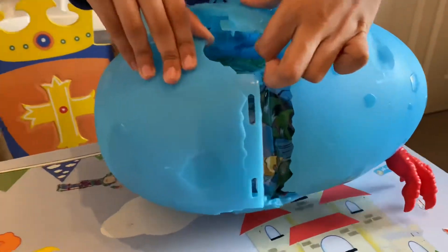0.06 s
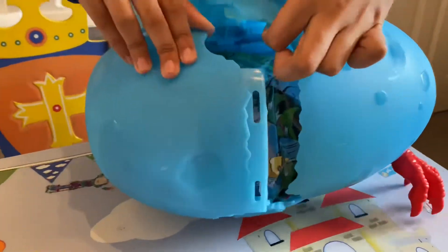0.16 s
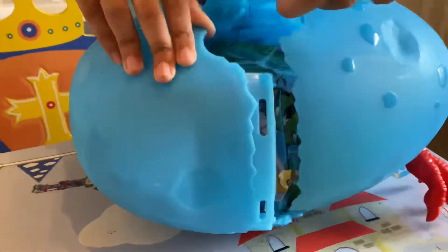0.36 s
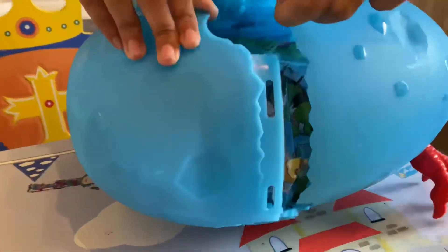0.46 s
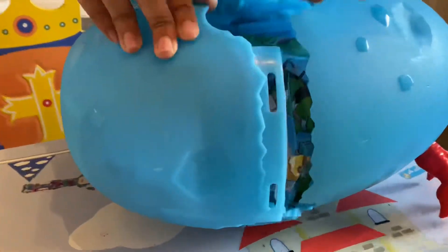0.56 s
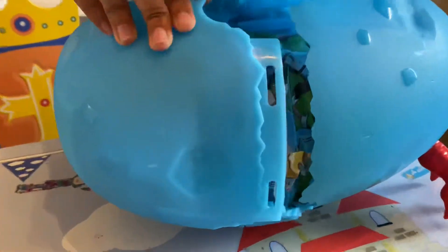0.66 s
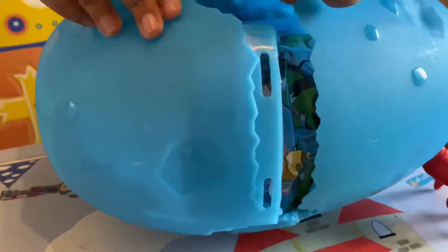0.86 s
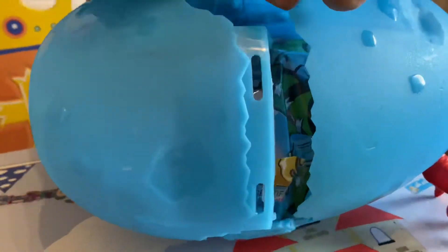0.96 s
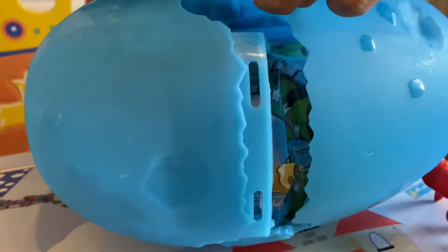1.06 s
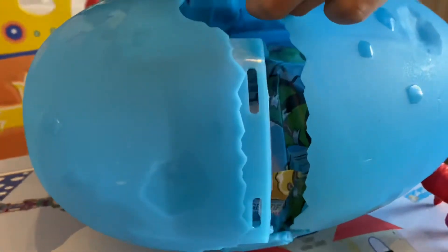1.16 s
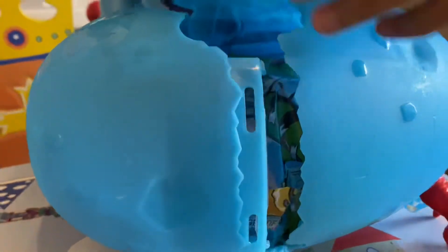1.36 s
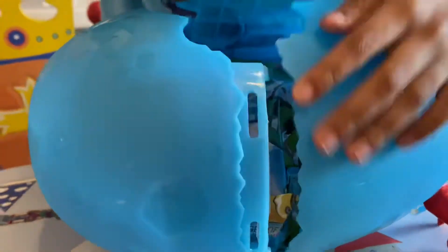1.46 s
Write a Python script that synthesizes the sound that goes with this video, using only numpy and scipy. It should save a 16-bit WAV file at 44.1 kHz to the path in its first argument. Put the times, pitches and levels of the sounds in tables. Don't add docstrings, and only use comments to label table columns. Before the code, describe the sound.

A big hollow plastic shell snaps sharply and thumps twice in quick succession, very close, in a small room; then faint rubs, creaks and soft knocks from fingers, ending with a small clicking drop.

```python
import sys
import numpy as np
from scipy import signal
from scipy.fft import rfft, irfft
from scipy.io import wavfile
from scipy.ndimage import uniform_filter1d

SR = 44100
rng = np.random.default_rng(int(sys.argv[2]) if len(sys.argv) > 2 else 0)


def volts_from_decibels(level):
    exponent = np.asarray(level, float) / 20
    return 10 ** exponent


def master_out(mix):
    frames = np.transpose(np.atleast_2d(mix))
    ceiling = np.clip(frames, -1, 1)
    pcm = np.round(ceiling * 32767).astype(np.int16)
    wavfile.write(sys.argv[1], SR, pcm)


N = 66150

# f/Hz, level/dB, decay time t60/s
SHELL_MODES = [(207, -2.5, 0.13), (245, 6, 0.11), (332, -3.5, 0.085), (420.4, -9, .25), (492.4, -15, 0.23),
               (610, -24, .2), (717, -7, 0.44), (881.5, -13.5, .2), (898, -9.5, 0.31), (1069, -16, .14),
               (1255, -9, 0.6), (1760, -20.5, 0.13), (2330, -22.5, 0.16), (2717, -13, .16)]
HALVES = np.array([[0.5], [-0.5]])


def evened(x):
    return x / np.sqrt(np.mean(x ** 2) + 1e-20)


def read(points, hz):
    f, value = np.transpose(points)
    return np.interp(np.log(hz + 1), np.log(f + 1), value)


def add(mix, s, sound):
    part = mix[..., round(s * SR):][..., :sound.shape[-1]]
    part += sound[..., :part.shape[-1]]


def colour(x, gain):
    hz = np.fft.rfftfreq(x.shape[-1], 1 / SR)
    return irfft(rfft(x) * gain(hz), x.shape[-1])


def delayed(x, s):
    return colour(x, lambda hz: np.exp(-2j * np.pi * hz * s))


def peak_gain(hz, middle_hz, share, db):
    return 1 + volts_from_decibels(db) / (1 + ((hz - middle_hz) / (share * middle_hz)) ** 2)


def pair(x):
    # f/Hz, likeness (0 to 1)
    likeness = [(60, 0.48), (300, 0.64), (700, 0.42), (1500, 0.34), (3000, 0.054), (16000, 0)]

    def same(hz):
        return np.clip(read(likeness, hz), 0, 0.999)

    middle = colour(x[0], lambda hz: np.sqrt((1 + same(hz)) / 2))
    side = colour(x[1], lambda hz: np.sqrt((1 - same(hz)) / 2))
    return np.array([middle + side, middle - side])


def resonate(x, peaks):
    out = 0
    for hz, width_hz, db in peaks:
        out = out + volts_from_decibels(db) * signal.lfilter(*signal.iirpeak(hz, hz / width_hz, SR), x)
    return out


def rings(x, modes):
    t = np.arange(SR // 2) / SR
    ring = 0
    for hz, db, t60 in modes:
        longest = 0.22 if hz > 150 else 1
        ring = ring + volts_from_decibels(db - 60 * t / min(t60, longest)) * np.sin(2 * np.pi * hz * t)
    ring = ring / np.linalg.norm(ring) / np.sqrt(SR / 400)
    return signal.fftconvolve(x, ring)[:N]


def room_air():
    # f/Hz, density/dB per Hz
    air_spectrum = [(15, -32), (25, 4.5), (256, -8), (384, -9), (887, -21), (1700, -18.5), (3820, -31),
                    (5880, -32.5), (16000, -48)]
    noise = colour(rng.standard_normal((2, N)), lambda hz: volts_from_decibels(read(air_spectrum, hz)))
    return volts_from_decibels(-71) * evened(pair(noise))


def room(x):
    # f/Hz, t60/s
    reverberation = [(100, 0.34), (400, 0.18), (1500, 0.25), (4000, 0.22), (10000, 0.21)]
    spacing = 20
    taps = np.zeros((2, SR // 2))
    at = np.arange(200, SR // 2 - 20, spacing)
    at_random = at + rng.integers(0, spacing, (2, len(at)))
    np.put_along_axis(taps, at_random, rng.choice([-1., 1.], (2, len(at))), 1)
    hz, t, z = signal.stft(taps, SR, nperseg=256)
    decay = volts_from_decibels(-60 * t / read(reverberation, hz)[:, None])
    tail = pair(signal.istft(z * decay, SR, nperseg=256)[1])
    return signal.fftconvolve(x, tail / np.linalg.norm(tail[0]), axes=1)[:, :N]


def patchy(x):
    z = signal.stft(x, nperseg=256)[2]
    patches = rng.standard_normal(z.shape[1:])
    patches = uniform_filter1d(patches, size=4, axis=0)
    patches = uniform_filter1d(patches, size=8, axis=1)
    return signal.istft(z * volts_from_decibels(3.5 * evened(patches)), nperseg=256)[1][:, :N]


def slide_noise(slide_db, sing_hz):
    # f/Hz, density/dB per Hz
    slide_spectrum = [(350, -31), (600, -16), (1530, -6.5), (2180, -5.5), (6200, -10.5), (10900, -18),
                      (12200, -24.5), (14300, -13.5), (16000, -43.5)]
    grains_per_s, grain_db = 4400, 2
    noise = rng.standard_normal((2, 8192))
    size = np.minimum(rng.exponential(1, 8192), 3)
    caught = rng.random(8192) < grains_per_s / SR
    grains = noise * (0.5 + volts_from_decibels(grain_db * size) * caught)
    brighten_db = 0.12 * (slide_db + 47)

    def gain(hz):
        body = volts_from_decibels(read(slide_spectrum, hz) + brighten_db * np.log2(1 + hz / 2000)) * (hz > 500)
        fixed_peaks = peak_gain(hz, 1300, 0.038, 0) * peak_gain(hz, 2207, 0.018, 0)
        return body * fixed_peaks * peak_gain(hz, sing_hz, 0.05, 7)

    return evened(colour(grains, gain))


def creak_noise():
    # f/Hz, width/Hz, level/dB
    creak_peaks = [(176, 180, 5.5), (345, 50, 8), (406, 20, -6), (477, 30, -21.5), (89.5, 19, -12)]
    slips_per_s, slip_db = 380, 4
    noise = rng.standard_normal((2, 8192))
    size = np.minimum(rng.exponential(1, 8192), 3)
    slipped = rng.random(8192) < slips_per_s / SR
    slips = noise * volts_from_decibels(slip_db * size) * slipped
    return evened(resonate(resonate(slips, creak_peaks), [(300, 1500, 0)]))


def rubbing():
    # middle t/s, length/s, slide level/dB, pressure level/dB, singing f/Hz
    strokes = [(.02, 0.13, -72.5, -56, 960), (0.099, 0.06, -103, -64.5, 770),
               (.203, .012, -47.5, -55.5, 2768), (0.393, 0.045, -72, -58.5, 2480),
               (.555, 0.07, -67.5, -65.5, 1190), (.7, 0.056, -76, -70.5, 1930),
               (.748, 0.051, -64.5, -61, 4920), (.84, 0.062, -55.5, -61, 8300),
               (0.889, 0.048, -47, -50, 2200), (.975, 0.074, -59.5, -52.5, 1990),
               (1.035, 0.047, -61.5, -64, 1236), (1.087, 0.13, -67, -57, 1300),
               (1.15, 0.088, -55.5, -53, 2056), (1.225, 0.066, -60, -61.5, 1330),
               (1.319, 0.18, -66, -60.5, 1780), (1.425, 0.043, -40, -45.5, 2390),
               (1.47, 0.069, -47.5, -66, 2290)]
    # t/s, left-right level/dB
    hand_place = [(.3, 0), (0.599, 2), (1., 1.5), (1.15, -2), (1.4, 0.5)]
    lead_s = 0.5
    t = np.arange(-4096, 4096) / SR
    out = np.zeros((2, N + SR))
    for middle, length, slide_db, press_db, sing_hz in strokes:
        swell = np.exp(-(2 * t / length) ** 2)
        contact = volts_from_decibels(slide_db) * slide_noise(slide_db, sing_hz) + volts_from_decibels(press_db) * creak_noise()
        add(out, middle + lead_s + t[0], swell * contact)
    rub = patchy(pair(out[:, SR // 2:][:, :N]))
    pan_db = np.interp(np.arange(N) / SR, *np.transpose(hand_place))
    return rub * volts_from_decibels(pan_db * HALVES)


def squeak():
    # t/s, f/Hz, level/dB
    squeak_path = [
        (1.268, 8800, -74),
        (1.287, 9380, -61),
        (1.345, 9300, -63),
        (1.382, 8400, -72),
    ]
    t = np.arange(N) / SR
    s, hz, db = np.transpose(squeak_path)
    waver = 1 + 0.0039 * evened(uniform_filter1d(rng.standard_normal(N), size=150))
    phase = 2 * np.pi * np.cumsum(np.interp(t, s, hz) * waver) / SR
    return volts_from_decibels(np.interp(t, s, db, -200, -200)) * np.sin(phase)


def cracks():
    # t/s, level/dB, t60/s, brightness/dB per octave, ringing edge f/Hz
    fractures = [(0.0202, -53.5, 0.055, 0, 2560), (0.0659, -63, 0.029, -35, 865),
                 (0.2054, -14.5, 0.034, 0.5, 2640), (0.2099, -15, 0.037, 5.5, 7040),
                 (0.2162, -19.5, 0.17, 0, 6600), (0.236, -12, 0.026, 1.5, 1940),
                 (0.241, -15.5, 0.057, -1.5, 970), (0.3797, -38, 0.017, 4, 2360),
                 (.5302, -67.5, 0.071, 8, 6920), (0.8031, -51, 0.021, 3, 3940),
                 (0.8888, -39.5, 0.039, 12, 3700), (0.8973, -55, 0.071, 9.5, 2250),
                 (0.9663, -51.5, 0.048, 5.5, 2060), (1.293, -53, .025, -8, 1190),
                 (1.4062, -34, 0.086, 11, 6200), (1.416, -33.5, 0.15, 14.5, 3600)]
    # f/Hz, density/dB per Hz
    fracture_spectrum = [(300, -10.5), (800, -8), (1300, -11.5), (2500, -18.5), (4500, -32.5),
                         (10000, -46.5), (16000, -53.5)]
    rise_s, pan_db = 0.0011, -1.5
    out, t = np.zeros((2, N)), np.arange(8192) / SR
    for s, db, t60, tilt_db, edge_hz in fractures:
        size = np.minimum(rng.exponential(1, 8192), 3)
        grit = rng.standard_normal((2, 8192)) * volts_from_decibels(2.5 * size)

        def gain(hz):
            tilted_db = read(fracture_spectrum, hz) + tilt_db * np.log2((hz + 50) / 2000)
            return volts_from_decibels(tilted_db) * (hz > 250) * peak_gain(hz, edge_hz, 0.081, 8.5)

        envelope = np.minimum(t / rise_s, 1) * volts_from_decibels(db - 60 * t / t60 + pan_db * HALVES)
        add(out, s, envelope * pair(evened(colour(grit, gain))))
    return out + volts_from_decibels(7) * rings(out.mean(0), SHELL_MODES)


def knocks():
    # t/s, level/dB, end pitch f/Hz, length/s, table share/dB
    hard_knocks = [
        (0.0197, -52, 276, 0.013, 10),
        (0.065, -40, 245, 0.01, -3.5),
        (0.2082, -8, 239, .011, -6),
        (0.2372, -8.5, 246.2, .011, -5.5),
        (0.377, -38.5, 406, 0.0061, -3.5),
        (.854, -38, 243, .013, -0.5),
        (1.292, -46, 263, 0.019, -6.5),
        (1.417, -36.5, 171.7, .016, 8.5),
    ]
    # t/s, level/dB, pitch f/Hz, length/s, table share/dB
    soft_bumps = [(.093, -52, 300, 0.011, -4), (0.22, -11.5, 323.5, .016, -7.5),
                  (0.245, -16.5, 300, .012, -3.5), (.52, -58.5, 361, .015, -11.5),
                  (0.557, -58.5, 368, .012, -7.5), (0.814, -54.5, 371, 0.019, -13),
                  (.872, -46.5, 205, 0.0075, 0), (.945, -53.5, 438, 0.018, -13),
                  (0.973, -46.5, 389, 0.013, -10), (0.985, -45.5, 300, 0.0138, -1),
                  (1.131, -48, 331, 0.019, -8), (1.207, -51, 413, 0.023, -13),
                  (1.344, -53.5, 337, 0.013, -7), (1.402, -31.5, 345, 0.018, -3)]
    # f/Hz, level/dB, t60/s
    table_modes = [(96.9, 1, .36), (139, 1.5, 0.14), (63, -15, 0.24), (199, 3.5, 0.11), (250, 1.5, 0.11),
                   (168, 1.5, 0.053)]
    start_ratio, drop_s, sag_ratio = 2.678, 0.0023, 1.52
    push_s = 0.0045
    jolt = np.sin(np.pi * np.arange(0, push_s, 1 / SR) / push_s) ** 2
    sweep, push = np.zeros(N), np.zeros(N)
    for hardness, hits in ((0.99, hard_knocks), (0.012, soft_bumps)):
        for s, db, hz, length, table_db in hits:
            t = np.arange(0, length, 1 / SR)
            fall = sag_ratio ** (1 - t / length) * (1 + (start_ratio - 1) * np.exp(-t / drop_s))
            phase = 2 * np.pi * np.cumsum(hz * fall ** hardness) / SR
            add(sweep, s, volts_from_decibels(db) * np.sin(np.pi * t / length) ** 0.68 * np.sin(phase))
            add(push, s + 0.7 * length, volts_from_decibels(db + table_db) * jolt)
    shell = sweep + volts_from_decibels(-8.5) * rings(sweep, SHELL_MODES)
    table = rings(push, table_modes)
    return shell, np.array([volts_from_decibels(2.5) * delayed(table, 0.00066), table])


def scene():
    shell, table = knocks()
    near = shell + squeak()
    near = np.array([delayed(near, 0.00012), near]) + cracks()
    rub = rubbing()
    return near + volts_from_decibels(-7) * room(near) + rub + volts_from_decibels(-7.5) * room(rub) + table + room_air()


def top_cut(x):
    return signal.sosfilt(signal.butter(12, 16380, fs=SR, output="sos"), x)


def record(dry):
    cut = signal.sosfilt(signal.butter(5, 56, "high", fs=SR, output="sos"), dry)
    dip_hz, dip_width_hz, dip_db, top_hz = 12220, 680, -29.5, 15650

    def response(hz):
        dip = volts_from_decibels(dip_db * np.exp(-((hz - dip_hz) / dip_width_hz) ** 4))
        return dip / (1 + (hz / top_hz) ** 200)

    return top_cut(colour(cut, response))


dry = scene()
out = record(dry)
master_out(out)
```